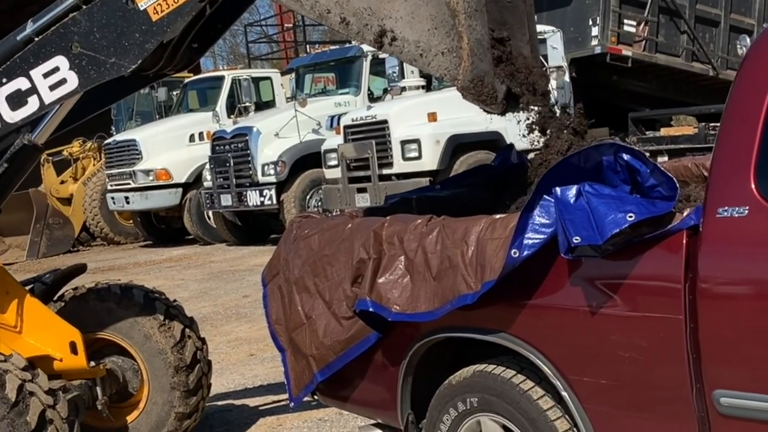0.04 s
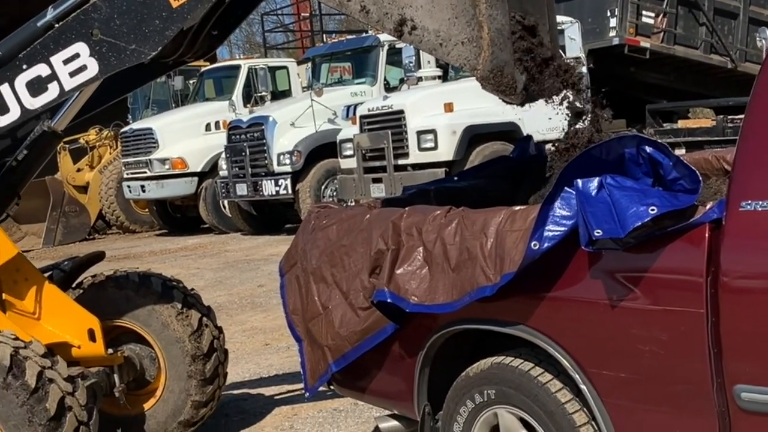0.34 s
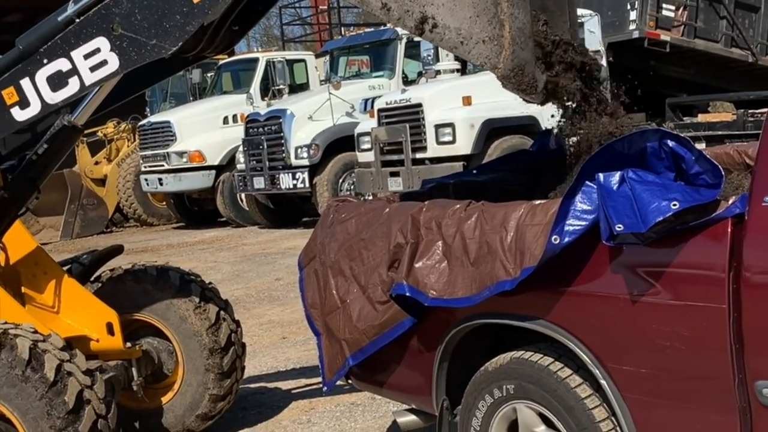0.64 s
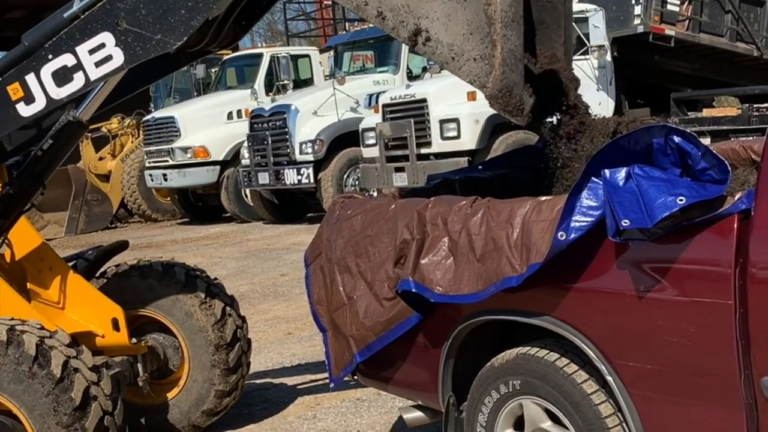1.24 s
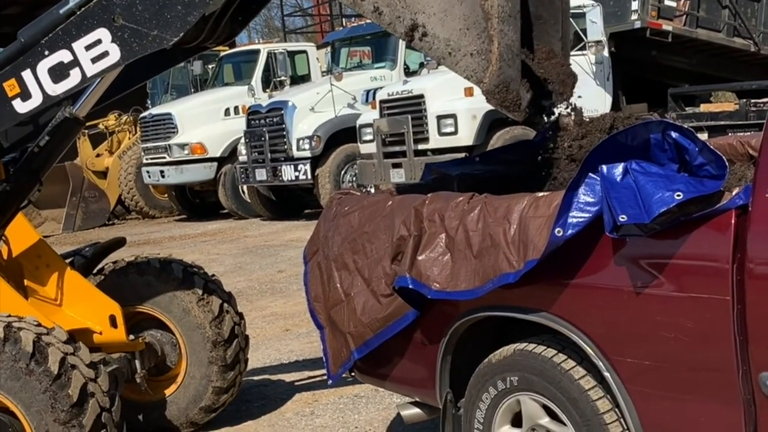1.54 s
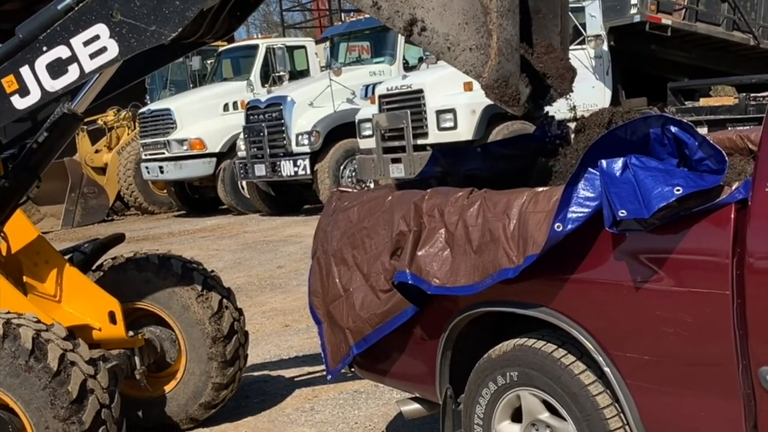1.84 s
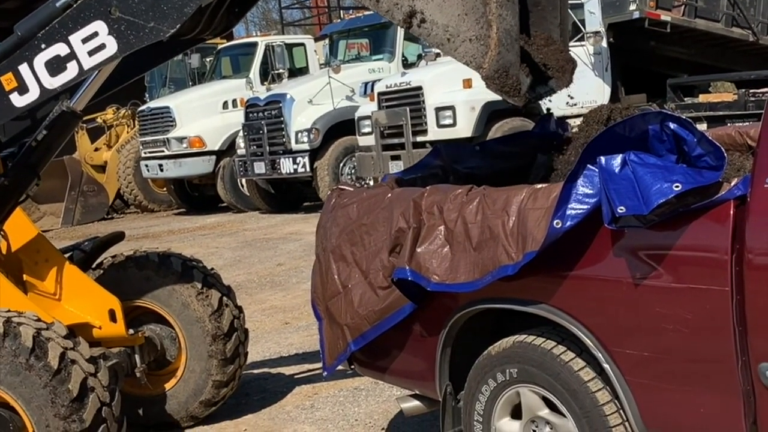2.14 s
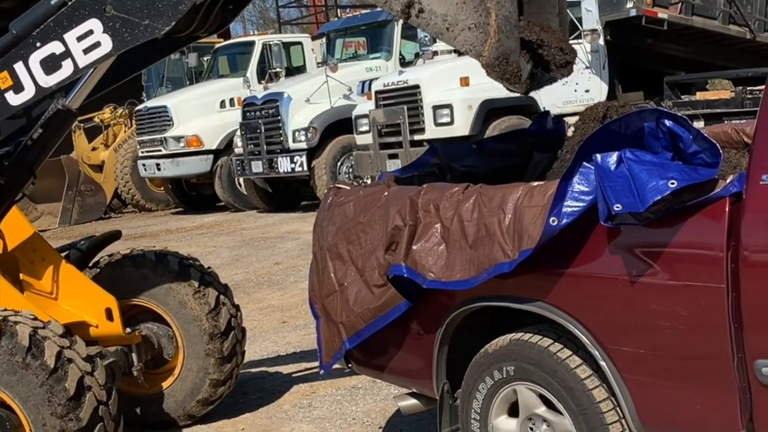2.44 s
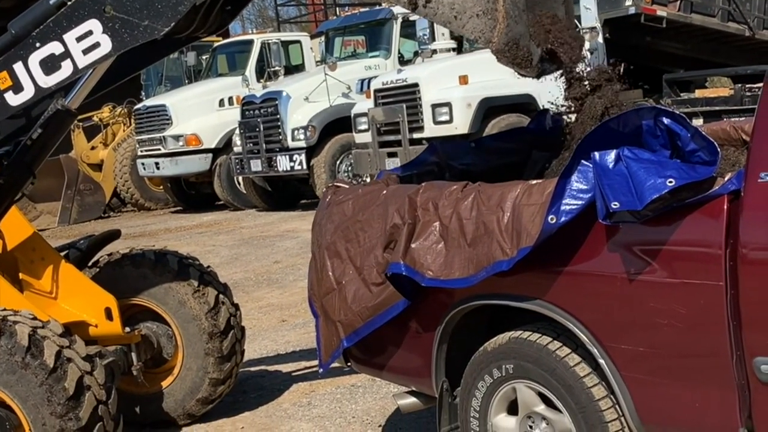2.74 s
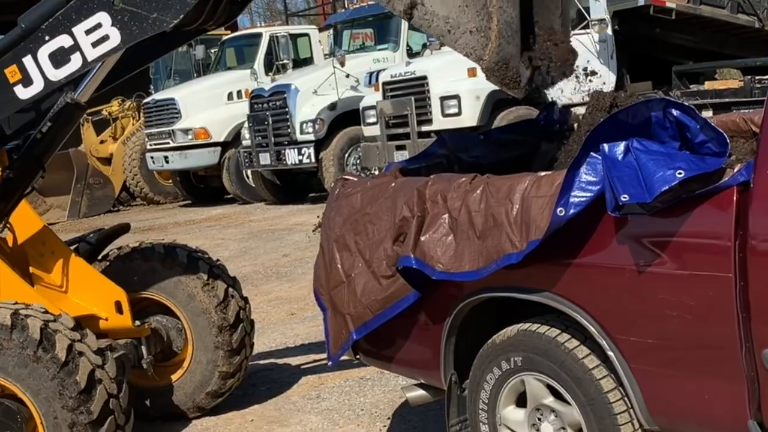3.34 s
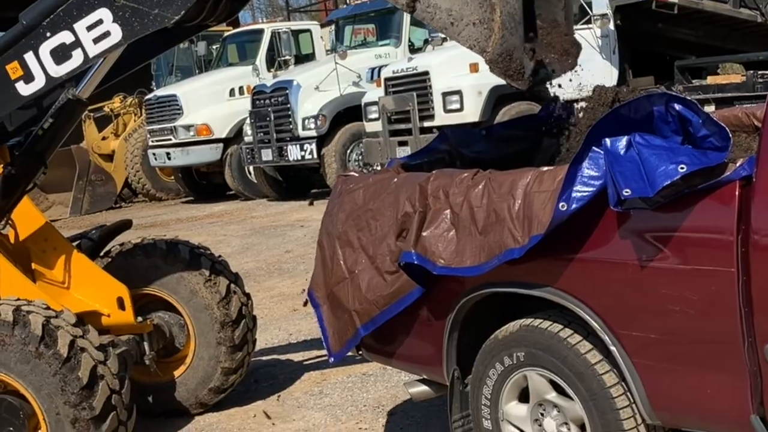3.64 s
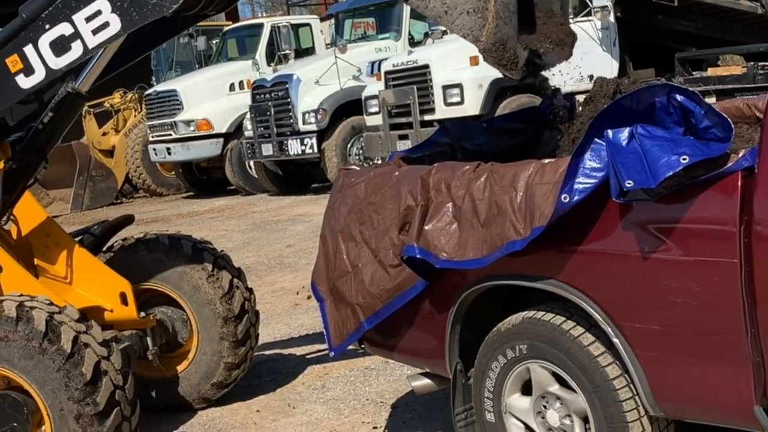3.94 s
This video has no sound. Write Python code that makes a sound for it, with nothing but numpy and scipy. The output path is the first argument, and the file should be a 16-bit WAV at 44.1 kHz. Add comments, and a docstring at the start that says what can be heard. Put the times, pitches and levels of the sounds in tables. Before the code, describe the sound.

A loader bucket shakes nearby outdoors over a steady diesel idle. From about 0.3 to 1.1 seconds it booms, clanks and jingles rapidly, while soil pours and clods thud into a pickup bed. Then the engine and a faint trickle of grit remain. From 2.3 to 3.3 seconds a second, slightly louder bout brings ringing steel hits and more thuds. The soil tails off by 3.7 seconds, leaving the idle.

```python
"""Loader shaking out its bucket

A diesel wheel loader idles in an open yard and shakes its bucket in two bouts over a pickup bed.
The bucket booms and clanks against its stops and loose steel jingles; soil pours, grit trickles
and clods thud into the hollow bed. Parked trucks answer the steel faintly, and the stereo pair
turns the treble out of phase."""
import sys
import numpy as np
from scipy import signal
from scipy.fft import rfft, irfft, next_fast_len
from scipy.io import wavfile
from scipy.ndimage import map_coordinates

SR = 44100
rng = np.random.default_rng(int(sys.argv[2]) if len(sys.argv) > 2 else 0)


def transcribe(signal):
    """Save signal, clipped to [-1, 1], as a 16-bit WAV file at the path in sys.argv[1]."""
    frames = np.atleast_2d(signal).T
    limited = np.clip(frames, -1, 1)
    pcm = np.round(limited * 32767).astype(np.int16)
    wavfile.write(sys.argv[1], SR, pcm)


N = 176400


def amp(db):
    return 10 ** (np.asarray(db) / 20)


def unit(x):
    return x / np.sqrt(np.mean(x ** 2) + 1e-20)


def along(points, hz):
    """(Hz, value) points read on a log axis."""
    f, v = np.transpose(points)
    return np.interp(np.log(hz + 1), np.log(f + 1), v)


def tint(points, hz):
    """Gain of an EQ curve of (Hz, dB) points, falling steeply above the last one."""
    return amp(along(points, hz)) / np.maximum(hz / points[-1][0], 1) ** 4


def curve(rows):
    """(s, value) points, one value per sample."""
    return np.interp(np.arange(N) / SR, *np.transpose(rows))


def wobble(rate):
    """A smooth random curve, rate knots a second."""
    return map_coordinates(rng.standard_normal(2048), [np.arange(N) * rate / SR + 2], mode="wrap")


def filtered(x, response):
    """x shaped by a frequency response."""
    n = x.shape[-1]
    m = next_fast_len(n + SR // 5)
    return irfft(rfft(x, m) * response(np.fft.rfftfreq(m, 1 / SR)), m)[..., :n]


def resonate(x, peaks):
    """x ringing through (Hz, width Hz, dB) resonances of alternating polarity."""
    def response(f):
        return sum((-1) ** k * amp(db) * 1j * f * width / (hz * hz - f * f + 1j * f * width)
                   for k, (hz, width, db) in enumerate(peaks))
    return filtered(x, response)


def noise(spectrum, grain_db=0):
    """Noise with a given level per Hz, clumped into grains on request."""
    source = unit(rng.standard_normal(N) * amp(grain_db * wobble(450)))
    return filtered(source, lambda hz: tint(spectrum, hz)) * np.sqrt(SR / 2)


def add(track, s, sound):
    """Mix a sound into the track at s seconds."""
    part = track[max(0, round(s * SR)):][:len(sound)]
    part += sound[:len(part)]


def burst(colour, attack_s, t60, grain_db):
    """A flurry of tiny contacts that swells and dies, about rms 1 at its height."""
    t = np.arange(SR // 2) / SR
    shape = np.minimum(t / attack_s, 1) * amp(-60 * np.maximum(t - attack_s, 0) / t60)
    grains = amp(grain_db * np.repeat(rng.standard_normal(len(t) // 45), 45))
    x = shape * filtered(rng.standard_normal(len(t)) * grains, lambda hz: tint(colour, hz))
    return x * np.linalg.norm(shape) / np.linalg.norm(x)


def ring(modes, attack_s, scatter, blur):
    """Decaying (Hz, dB, t60 s) modes; scatter detunes each blow, blur lets the phase wander."""
    t = np.arange(SR // 2) / SR
    x = np.zeros(len(t))
    for hz, db, t60 in modes:
        level, detune, start = rng.standard_normal(3)
        drift = blur * np.cumsum(rng.standard_normal(len(t))) / np.sqrt(SR)
        decay = amp(db + 0.89 * level - 60 * t / t60)
        x += decay * np.sin(2 * np.pi * (hz * (1 + scatter * detune) * t + start) + drift)
    return x * (1 - np.exp(-t / attack_s))


def engine():
    """Diesel idle: exhaust tones and hum over a rumble; drone and clatter pulse with the firings."""
    # engine speed, sagging under load (time [s], firing rate [Hz])
    speed = [(0, 31.6), (.65, 31.3), (1.2, 31.7), (1.7, 31.7), (2.2, 31.2), (2.6, 30.4), (3.0, 31.1),
             (3.35, 31.6), (4, 31.6)]
    # exhaust tones (multiple of the firing rate, level [dB])
    orders = [(2, -43), (3, -42), (4, -44.5), (5.5, -42.5), (6, -38.5)]
    # steady machinery hum (frequency [Hz], level [dB])
    hum_tones = [(92.5, -31), (121.3, -35.5), (310.5, -51), (326, -46.5), (421, -47.5), (492, -57.5)]
    # low rumble, panel drone and injector clatter (frequency [Hz], level [dB per Hz])
    rumble = [(30, -83), (46, -68), (62, -52), (78, -74), (105, -53), (140, -63), (200, -62), (260, -85),
              (500, -102)]
    drone = [(120, -52.5), (230, -74), (280, -60), (345, -68.5), (385, -58.5), (425, -55.5), (455, -74.5),
             (510, -65.5), (610, -78.5), (1000, -115.5)]
    clatter = [(200, -100), (400, -105), (720, -72.5), (850, -78), (1050, -73.5), (1400, -72.5),
               (1900, -80), (2800, -79.5), (4000, -85), (6500, -89), (10000, -102.5), (15500, -101)]
    t = np.arange(N) / SR
    phase = 2 * np.pi * np.cumsum(curve(speed) * (1 + 0.0027 * wobble(7.88))) / SR  # one turn a firing
    exhaust = sum(amp(db + wobble(8.34)) * np.sin(k * phase + 2 * np.pi * rng.random())
                  for k, db in orders)
    hum = sum(amp(db + wobble(6.15)) * np.sin(2 * np.pi * (hz * t + rng.random()) + 0.26 * wobble(4.21))
              for hz, db in hum_tones)
    throb_db = (1.2 * np.cos(phase) + 5.4 * np.cos(3 * phase)
                + 0.17 * np.cos(phase / 2) + 3 * np.cos(1.25 * phase))
    tick_db = 1.6 * np.cos(phase) + .5 * np.cos(2 * phase) + 0.056 * np.cos(phase / 2) + 1.2 * wobble(13)
    body = np.sqrt(2) * (exhaust + hum) + noise(rumble)
    pulsing = unit(amp(throb_db)) * noise(drone) + unit(amp(tick_db)) * noise(clatter)
    return body + pulsing + injectors(phase)


def injectors(phase):
    """One short metallic tick per firing, each a little different in strength."""
    # resonances rung by the ticks (frequency [Hz], width [Hz], gain [dB])
    resonances = [(1260, 230, -13.5), (3080, 37, -3)]
    since_firing = phase / (2 * np.pi) % 1
    ticks = np.exp(-since_firing / 0.36) * amp(0.83 * wobble(30.26)) * rng.standard_normal(N)
    return amp(-54) * unit(resonate(ticks, resonances))


def soil():
    """Crumbs patter while the soil pours, and fine grit trickles unevenly on top."""
    # flow of soil and of grit (time [s], gain [dB])
    soil_flow = [(0, -25), (.25, 0), (.6, 0), (.85, 8), (1.1, 6), (1.4, -21), (2.15, -22), (2.45, 3.5),
                 (2.8, 5), (3.15, 6), (3.4, 0.5), (3.7, -22), (4, -38)]
    grit_flow = [(0, 0), (.6, 3.5), (1.2, 5), (1.5, 3), (2.12, -5.5), (2.24, 6.5), (2.35, -7.5), (2.68, -6),
                 (3.1, 5), (3.4, 8), (3.7, -1), (4, -2)]
    # dull patter of soil and fine hiss of grit (frequency [Hz], level [dB per Hz])
    patter = [(40, -100), (150, -65.5), (260, -57.5), (420, -63.5), (650, -75.5), (3000, -89.5),
              (6000, -101)]
    hiss = [(2500, -112), (6000, -99), (10500, -94.5), (15500, -108)]
    pour = amp(curve(soil_flow) + 0.7 * wobble(25.2)) * noise(patter, grain_db=2.5)
    trickle = amp(curve(grit_flow) + 3.9 * wobble(15)) * noise(hiss, grain_db=2.5)
    return pour + trickle


def bucket_knocks():
    """Each knock scrapes and clanks in the linkage, then the soil-damped shell thumps and booms."""
    # two bouts of shaking (time [s], boom, thump, clank, scrape [each in relative dB])
    knocks = [(.092, -30.5, -30, -43.5, -46), (.294, -29.5, -25.5, -47, -57), (.341, -50, -44, -30.5, -46),
              (0.377, -18, -19, -31.5, -37.5), (0.511, -48, -38, -32, -54), (.570, -17, -16, -29, -35),
              (0.684, -26.5, -19, -29.5, -55), (.764, -16, -25.5, -29.5, -39),
              (.853, -18.5, -20.5, -27.5, -46), (1.017, -22, -19, -38, -36), (2.298, -34, -32, -34.5, -64),
              (2.372, -22.5, -17, -30, -58), (2.459, -21.5, -24, -31, -37.5), (2.565, -26, -33, -35.5, -61),
              (2.636, -19.5, -36, -45, -44.5), (2.728, -25, -28, -24.5, -38.5),
              (2.751, -27, -20.5, -31, -47), (2.82, -13, -19, -23, -35.5), (2.914, -25, -16.5, -28, -42),
              (2.990, -14, -44, -26, -35.5), (3.088, -21.5, -19, -22.5, -37),
              (3.162, -25, -28, -31.5, -39.5), (3.260, -29, -16, -27, -39)]
    # the shell's low modes (frequency [Hz], level [dB], t60 [s])
    shell = [(245.8, -7.5, 0.19), (393.3, -8, 0.3), (444, 0.5, 0.12), (475, -3, 0.082), (719, -13.5, 0.079)]
    # colours of a knock's three noisy layers (frequency [Hz], level [dB])
    thump = [(60, 0.5), (150, -1), (265, 10.5), (330, -1), (410, 2), (560, -8), (900, -15)]
    clank = [(300, -51), (550, -1.5), (730, 5), (860, -3.5), (980, 0), (1120, -1.5), (1350, 2), (1700, -5),
             (2200, -10.5), (2900, -14.5), (4200, -18), (8000, -28.5)]
    scrape = [(1500, -35), (3300, 8), (4800, 10), (6600, 10.5), (8500, -11), (15500, -10)]
    scrape_lead_s, clank_lead_s, boom_delay_s = 0.0033, 0.002, 0.003803
    out = np.zeros(N)
    for s, boom_db, thump_db, clank_db, scrape_db in knocks:
        add(out, s + boom_delay_s,
            amp(boom_db + 6) * ring(shell, attack_s=0.009, scatter=0.021, blur=8.6))
        add(out, s, amp(thump_db) * burst(thump, attack_s=0.015, t60=0.14, grain_db=5.5))
        add(out, s - clank_lead_s,
            amp(clank_db + 1.5) * burst(clank, attack_s=0.0065, t60=0.12, grain_db=1))
        add(out, s - scrape_lead_s,
            amp(scrape_db) * burst(scrape, attack_s=0.0085, t60=0.11, grain_db=3.5))
    return out


def hard_stops():
    """The bucket hits its stops, steel on steel: a sharp crack, and its plates ring."""
    # hits (time [s], crack level [dB], ring level [dB])
    stops = [(.376, -32.5, -48), (0.566, -28.5, -51), (1.017, -30, -37), (2.735, -28.5, -25.5),
             (2.822, -30.5, -32), (3.085, -26.5, -33), (3.1, -35, -34), (3.261, -33, -37)]
    # colour of the crack (frequency [Hz], level [dB])
    crack = [(900, -14), (1900, 4), (3400, -4.5), (6000, -14)]
    # plate modes (frequency [Hz], level [dB], t60 [s])
    plates = [(925, -0.5, .17), (970, -8, 0.23), (1064, 4, 0.15), (1516, -19, 0.092), (1784, -8, 0.13),
              (3700, -8, 0.14)]
    out = np.zeros(N)
    for s, crack_db, ring_db in stops:
        add(out, s, amp(crack_db) * burst(crack, attack_s=.003, t60=0.048, grain_db=8))
        add(out, s, amp(ring_db) * ring(plates, attack_s=0.0066, scatter=0.0108, blur=7.9))
    return out


def jingle():
    """Loose steel on the bucket chatters against itself and rings briefly."""
    # jingles (time [s], relative level [dB])
    jingles = [(0.402, -45), (.428, -37.5), (0.792, -32), (1.036, -46), (2.486, -42.5), (2.514, -44),
               (2.54, -36.5), (3.019, -37), (3.047, -34.5), (3.066, -38)]
    # bright modes of the loose steel (frequency [Hz], level [dB], t60 [s])
    steel = [(5420, -12, .13), (6350, -8, .14), (7080, -9, .12), (7400, -5, .09), (7870, -1, .11),
             (8150, -4, .06), (10177, -7, .13), (10248, -9, .12), (11620, -10, .1)]
    # colour of the contact noise (frequency [Hz], level [dB])
    sizzle = [(3000, 0.5), (7000, 2.5), (11000, -25), (15500, -3)]
    out = np.zeros(N)
    for s, db in jingles:
        chink = ring(steel, attack_s=0.0011, scatter=0.003, blur=15)
        chatter = unit(amp(1.5 * wobble(330)))[:len(chink)]
        add(out, s, amp(db + 1.5) * chink * chatter)
        add(out, s, amp(db - 1.5) * burst(sizzle, attack_s=0.0024, t60=0.16, grain_db=-1))
    return out


def clods():
    """Heavy clods land in the bed with a crunch and a deep thud."""
    # landings (time [s], thud level [dB], crunch level [dB])
    landings = [(.589, -28, -36), (0.739, -26, -29), (.783, -28, -26), (.862, -17, -26.5), (0.91, -32, -32),
                (.932, -18.5, -32.5), (1.028, -21, -27.5), (1.218, -25, -40), (2.384, -29, -31),
                (2.502, -20.5, -47), (2.652, -22, -33), (2.756, -28, -35), (2.927, -25, -36),
                (3.122, -15, -51), (3.159, -25.5, -42), (3.268, -42, -26.5), (3.298, -28, -37)]
    # colour of the thud (frequency [Hz], level [dB])
    thud = [(22, -38), (44, 10), (60, 1.5), (80, 3.5), (105, 6.5), (170, -7), (300, -30), (800, -44)]
    out = np.zeros(N)
    for s, thud_db, crunch_db in landings:
        add(out, s, amp(crunch_db) * crunch())
        add(out, s, amp(thud_db) * burst(thud, attack_s=.02, t60=.24, grain_db=0))
    return out


def crunch():
    """A clod bursts into crumbs that strike the hollow bed, about rms 1 at its height."""
    # resonances of the bed (frequency [Hz], width [Hz], gain [dB])
    bed = [(677, 68, 4), (931, 56, 3), (1150, 200, -3.5), (1504, 82, -4.5), (1970, 160, -6.5)]
    crumbs_per_s, t60 = 1000, 0.15
    t = np.arange(SR // 2) / SR
    shape = amp(-60 * t / t60)
    crumbs = (rng.random(len(t)) < crumbs_per_s / SR) * rng.standard_normal(len(t))
    x = resonate(shape * crumbs, bed)
    return x * np.linalg.norm(shape) / np.linalg.norm(x)


def yard(x):
    """A short diffuse answer from the parked trucks, with 20 ms of pre-delay."""
    # decay of the yard (frequency [Hz], t60 [s])
    decay = [(100, 1), (500, 0.39), (3000, 0.15), (12000, 0.53)]
    hz, t, bands = signal.stft(rng.standard_normal(SR // 2), SR, nperseg=256)
    tail = signal.istft(bands * amp(-60 * t / along(decay, hz)[:, None]), SR, nperseg=256)[1]
    return signal.fftconvolve(x, np.pad(tail, (SR // 50, 0)) / np.linalg.norm(tail))[:N]


def scene():
    """The sources sit near the centre; scattered sound differs between the two sides."""
    # stereo width (frequency [Hz], side relative to mid [dB])
    width = [(100, -35.5), (400, -21), (700, -16), (1100, -8), (1700, -25), (2800, 2), (4700, -23)]
    metal = bucket_knocks() + hard_stops() + jingle()
    mid = metal + amp(-14.5) * yard(metal) + soil() + clods() + engine()
    side = filtered(mid * unit(wobble(120)), lambda hz: amp(along(width, hz)))
    stereo = np.array([mid + side, mid - side])
    return filtered(stereo, lambda hz: 1 / np.hypot(1, amp(along(width, hz))))  # width adds no power


def record(dry):
    """The stereo pair shifts level and phase between the sides, and trims sub-bass and extreme top."""
    # phase between the sides (frequency [Hz], left lead [rad])
    left_lead = [(20, 0), (150, -.04), (300, -.22), (450, -.6), (600, -1.2), (800, -.2), (1500, -.1),
                 (2600, .2)]
    # balance (frequency [Hz], left minus right [dB])
    balance = [(200, 0), (520, -.5), (640, -6), (800, -8), (1050, -2.5), (1500, 0), (2400, -.5), (2750, -4),
               (3700, 0)]
    turn_from_hz, full_turn_hz = 2790, 4200  # the lead keeps winding on through the treble
    low_cut_hz, top_hz = 53.7, 15800
    half = np.array([[.5], [-.5]])  # each side takes half, in opposite directions

    def pair(hz):
        lead = along(left_lead, hz) + 2 * np.pi * np.maximum(hz - turn_from_hz, 0) / full_turn_hz
        passband = (hz < top_hz) / np.hypot(1, (low_cut_hz / (hz + 1)) ** 4)
        return amp(half * along(balance, hz)) * np.exp(1j * half * lead) * passband
    return filtered(dry, pair)


dry = scene()
out = record(dry)
transcribe(out)
```